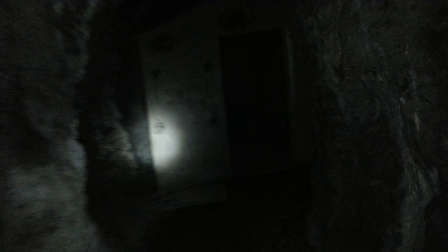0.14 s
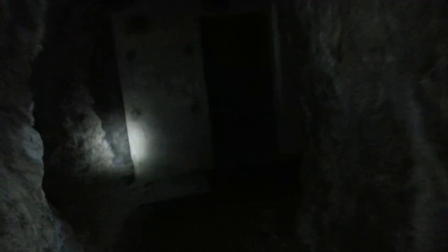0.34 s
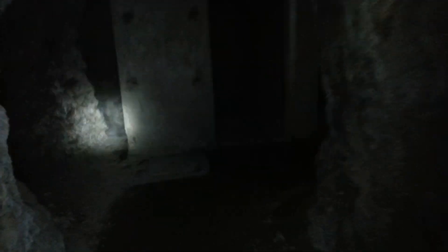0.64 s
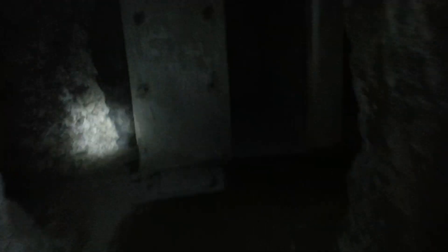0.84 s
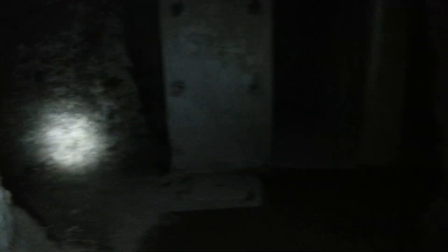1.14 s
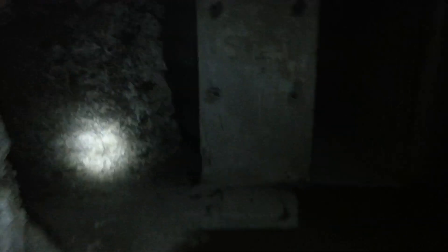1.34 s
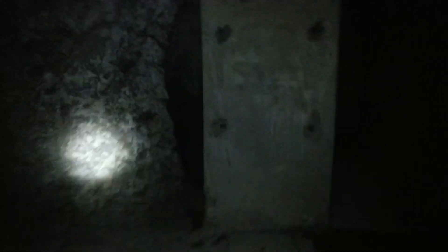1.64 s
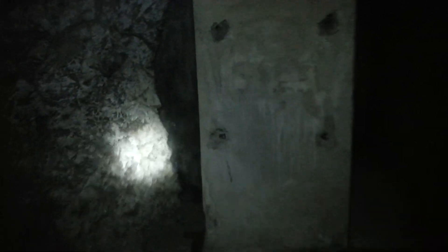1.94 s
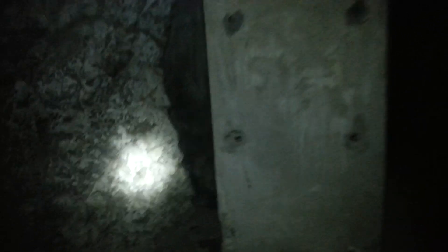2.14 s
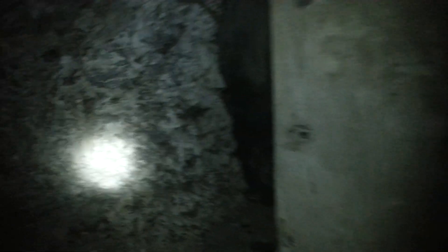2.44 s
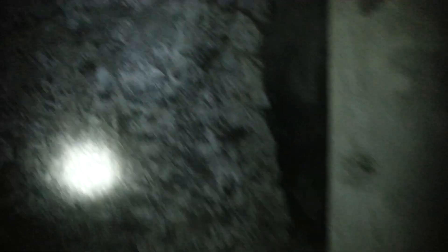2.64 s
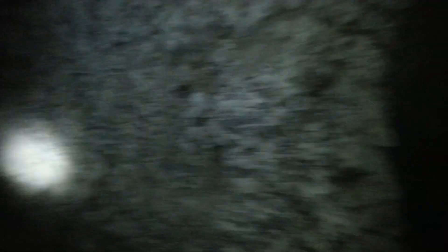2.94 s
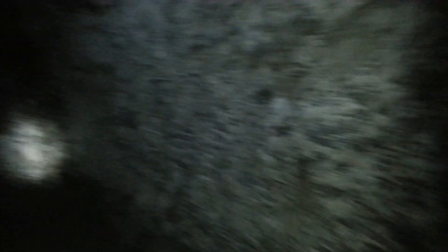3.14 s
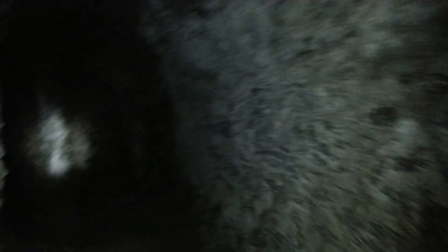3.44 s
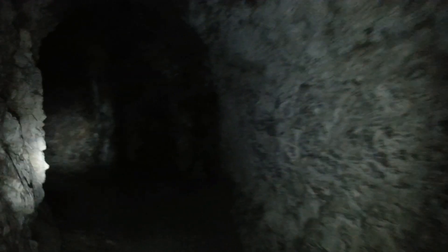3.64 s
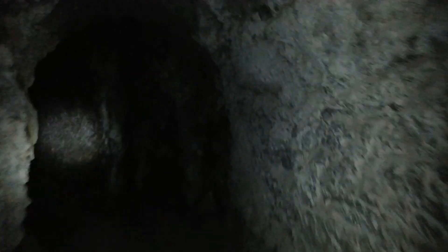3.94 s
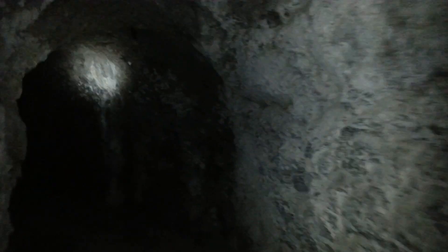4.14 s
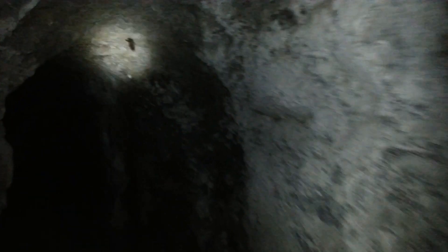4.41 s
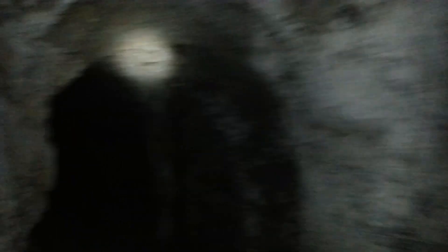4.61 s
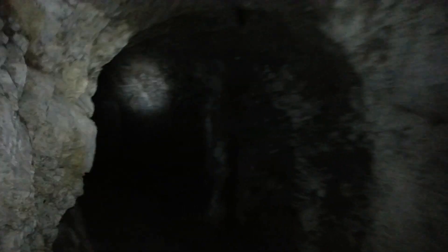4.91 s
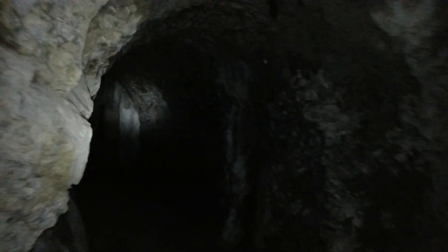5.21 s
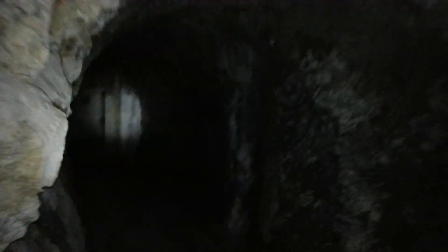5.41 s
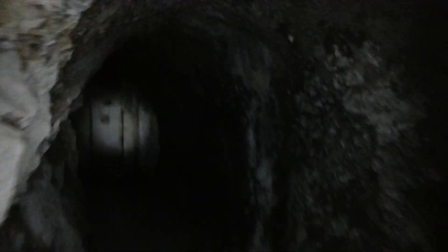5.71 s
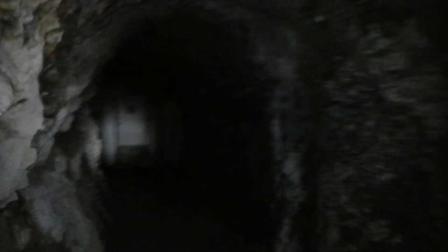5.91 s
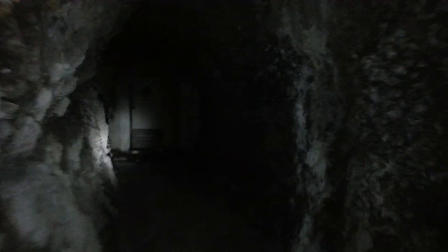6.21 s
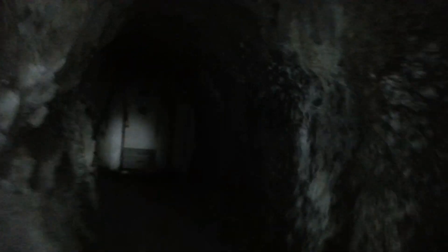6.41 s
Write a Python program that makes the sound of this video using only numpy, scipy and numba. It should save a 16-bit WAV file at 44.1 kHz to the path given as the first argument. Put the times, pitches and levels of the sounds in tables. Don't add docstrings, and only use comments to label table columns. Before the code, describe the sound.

Close stereo sound of boots on a gritty rock floor in a narrow stone tunnel, over faint air and amplifier hiss. From 0 to 0.6 s there is light grinding, small ticks and a very faint, high metal zip tinkle near 0.4-0.6 s. At 0.87 s a firm step lands with a thud and bright gritty crunch. The heaviest step follows at 1.37-1.45 s with hard stone knocks, then grinding and a loud sharp snap at 1.68 s. Another crunch with ticks comes around 2.07-2.2 s. Softer, drier steps and scuffs follow near 2.8 and 3.35 s. A fuller step at 3.84-4.02 s knocks stones, with another knock at 4.43 s. Quiet shuffling leads to lighter steps at 5.2 and 5.8 s, and a crisp stony crunch at 6.46 s. Near walls answer instantly, hollow and ringing, with about half a second of echo.

```python
import sys
import numpy as np
from scipy import signal
from scipy.fft import rfft, irfft, next_fast_len
from scipy.io import wavfile
from numba import njit

SR = 44100
rng = np.random.default_rng(int(sys.argv[2]) if len(sys.argv) > 2 else 0)


def wav_out(sig):
    wavfile.write(sys.argv[1], SR, np.round(np.clip(np.atleast_2d(sig).T, -1, 1) * 32767).astype(np.int16))


def ratio(d):
    e = np.asarray(d, float) / 20
    return 10 ** e


N = 289556
M = next_fast_len(N)
HZ = np.fft.rfftfreq(M, 1 / SR)

# frequency in Hz, density in dB per Hz.
HUSH = [(18, -54), (30, -34), (59, -6.5), (332, 0.5), (1020, -3), (1720, -6), (2240, -9.5), (3150, -7.5),
        (12600, -19.5), (14300, -15.5), (15500, -67)]
HUSH_DB = -48.5
# time in seconds, level in dB.
TAB = [(0.33, -88), (0.378, -52), (0.47, -46), (0.51, -76), (0.606, -50), (0.62, -70)]

# frequency in Hz, T60 in seconds.
TUNNEL_T60 = [(150, 1), (500, 0.53), (1500, 0.58), (4000, 0.52), (10000, 0.62)]
# frequency in Hz, level in dB.
SCATTER = [(150, -2.5), (400, -1), (800, 0.45), (3000, -0.06)]
# frequency in Hz, correlation from 0 to 1.
LIKENESS = [(100, 0.4), (250, .8), (500, 0.65), (1000, 0.03), (4000, 0.01), (12000, 0)]
# entered at in seconds, cross-wave T60 at 220 Hz in seconds.
STRETCHES = [(0, .6), (.845, .6), (1.36, .9), (1.95, .5), (2.6, .5), (3.2, .5), (3.79, .6), (4.28, .6),
             (4.94, .5), (5.195, .7), (5.74, .5), (6.37, .5)]
# frequency in Hz, level in dB.
CROSS_WAVES = [
    [(340, -9), (470, -9), (620, -7), (790, -3)],
    [(190, -11), (275, -10), (330, -9), (415, -9), (445, -8), (590, -10), (712, -10)],
    [(221, -5), (250, -5), (370, -10), (440, -8), (655, -9), (765, -10)],
    [(255, -9), (365, -10), (475, -7), (765, -7)],
    [(370, -8), (470, -8), (562, -10)],
    [(325, -8), (370, -9), (480, -10), (590, -8)],
    [(140, -12), (247, -7), (347, -9), (470, -7), (560, -13), (602, -8)],
    [(245, -8), (360, -9), (460, -10), (600, -10)],
    [(260, -9), (360, -9), (590, -8)],
    [(156, -12), (247, -7), (265, -8), (368, -9), (570, -10)],
    [(260, -10), (325, -9), (430, -9), (550, -9)],
    [(270, -10), (425, -8), (473, -6), (537, -8), (760, -9)],
]
# frequency in Hz, level in dB.
LENGTHWISE_WAVES = [(168, -14), (232, -11), (256, -10)]
ECHO_DB, CROSS_DB = -3.5, -6
NEAR_T60_S, NEAR_DB = 0.062, 10.5
TILT_DB = -2.5
SHORTER = .6

# frequency in Hz, left minus right in dB.
LEAN = [(60, -5), (110, 4.5), (200, 0), (380, 3.5), (700, -1.5), (1290, 5), (2380, 3.5), (4400, 3),
        (8120, -0.5), (15000, 4.5)]
# frequency in Hz, lead of the left in radians.
PORT_LEAD = [(200, 0.1), (600, 0.32), (1500, 0.79), (2700, .6), (5000, 1.6), (12000, 1.6)]
DIRECT_DB = -6.2

# time in seconds, resonance in Hz.
HOLLOW = [(0.0, 734), (.67, 470), (1.35, 493), (2.05, 580), (4.24, 600), (4.41, 1000), (4.52, 900),
          (5.17, 510), (6.57, 590)]
# time in seconds, resonance in Hz.
SLAB = [(0, 2600), (.5, 2800), (.9, 3600), (1.4, 3300), (2.07, 3000), (2.65, 3700), (3.4, 3000),
        (3.86, 4400), (4.0, 2800), (4.7, 3300), (5.26, 3800), (5.8, 4100), (6.57, 3000)]
HOUSING_HZ, HOUSING_DAMP, HOUSING_DB = 1680, .1, -7.5

# time in seconds, peak in dB, pitch in Hz.
TICKS = [(.14, -28, 2710), (.1895, -18, 3400), (.3346, -20, 3000), (.4115, -24, 2300), (.4674, -26, 3000),
         (.5531, -28, 3400), (.9144, -13, 3310), (.9304, -13, 2650), (1.3673, -21, 3470),
         (1.4132, -15, 3000), (1.4374, -17, 3800), (1.4905, -18, 3700), (1.5334, -21, 2400),
         (1.5614, -18, 2600), (1.569, -18, 3300), (2.0234, -23, 2650), (2.0627, -11, 3040),
         (2.0714, -10, 2820), (2.1244, -17, 2030), (2.6314, -31, 2300), (2.6744, -28, 3600),
         (2.7521, -25, 2930), (2.8464, -22, 3300), (2.919, -25, 2200), (3.042, -38, 3060),
         (3.1043, -38, 3150), (3.3543, -26, 2900), (3.8417, -21, 3700), (3.8736, -20, 2500),
         (3.8854, -21, 1830), (3.907, -21, 2960), (3.9534, -22, 3000), (3.9998, -15, 2470),
         (4.0314, -18, 2200), (4.0494, -19, 3500), (4.1114, -24, 4300), (4.5481, -32, 2970),
         (4.6902, -27, 3700), (5.009, -26, 2600), (5.2285, -27, 2900), (5.4084, -36, 3010),
         (5.8374, -25, 4300), (6.2163, -36, 2830), (6.4794, -21, 3500)]
TICK_CYCLES, TICK_DB, TICK_ECHO_DB = 4.5, 4.5, -4
# time in seconds, peak in dB, ring in Hz, low knock in dB.
KNOCKS = [(.188, -21.5, 855, -14), (.335, -16.5, 780, -24), (.554, -29, 706, -1), (.977, -9, 1160, -6),
          (1.375, -4, 680, -4), (1.431, 0, 646, -14), (1.532, -15, 754, -8), (2.179, -26, 942, -2),
          (2.753, -17, 660, -14), (3.235, -25.5, 603, -19), (3.323, -23, 700, 2), (3.442, -23, 1320, -1),
          (3.668, -32.5, 883, -1), (3.833, -13, 630, -9), (4.0, -8, 610, -31), (4.429, -14, 1130, -6),
          (4.557, -28, 1080, -8), (4.959, -26, 604, -9), (5.0095, -23, 430, -18), (5.208, -18, 600, 1),
          (5.869, -21, 1330, 0)]
KNOCK_TICK_DB, KNOCK_T60_MS = -27, 5.6
# time in seconds, peak in dB, ring in Hz, bright tick in dB.
SNAPS = [(.449, -20, 1720, -11.5), (.861, -17, 1460, -7), (.867, -13.5, 4250, -12),
         (1.1955, -17, 1740, -13), (1.616, -14, 3000, -14), (1.68, 1.2, 1777, -25.5),
         (1.81, -18, 3020, -10), (2.001, -14.5, 1730, -31), (2.044, -24, 3030, -9),
         (2.214, -13.5, 1370, -22), (2.639, -33, 1700, -11), (2.789, -23, 1800, -15),
         (2.8355, -17, 3100, -8.5), (2.9265, -16, 1740, -29), (3.773, -39, 1550, -13),
         (3.814, -18.5, 1200, -19.5), (4.297, -21, 1690, -16.5), (4.634, -27, 2640, -4.5),
         (5.114, -32, 1850, -6), (5.782, -21, 1740, -6), (6.053, -21, 1680, -14), (6.385, -33, 3400, -9),
         (6.422, -21, 1340, -18), (6.458, -7.5, 1700, -22)]
SNAP_KNOCK_DB, SNAP_T60_MS = -20, 4.9

# time in seconds, level in dB, swell and fade in seconds per 20 dB.
THUDS = [(0.0, -31, .01, .25), (.19, -26, .07, .055), (.338, -27, .04, .2), (.526, -33.5, .2, .09),
         (.866, -12, .012, .13), (.93, -16, .055, .05), (1.185, -35, .2, .2), (1.374, -9, .005, .08),
         (1.434, -10, .006, .05), (1.63, -31, .03, .12), (1.8, -33, .35, .11), (2.066, -29, .1, .25),
         (2.18, -28, .045, .055), (2.754, -36, .022, .04), (2.848, -32, .075, .085), (3.33, -37, .12, .12),
         (3.446, -33, .03, .06), (3.84, -23, .008, .25), (4.022, -16.5, .05, .045), (4.363, -35, .3, .06),
         (4.63, -32, .1, .2), (4.75, -37, .2, .14), (4.965, -36.5, .018, .08), (5.14, -40, .07, .1),
         (5.21, -26, .008, .1), (5.787, -28, .011, .05), (5.89, -30.5, .12, .09), (6.32, -38, .05, .06),
         (6.42, -24, .012, .025), (6.46, -26, .02, .15)]
# time in seconds, level in dB,
# fade in seconds per 20 dB, fineness from 0 (stones) to 1 (grit).
LANDINGS = [(0.0, -30, .3, .55), (.187, -25, .03, .8), (.398, -30, .1, .2), (.338, -25.5, .047, .85),
            (.854, -24, .05, .7), (.862, -18, .1, .9), (.871, -14, .16, .6), (1.193, -30, .08, .55),
            (1.367, -23, .1, .8), (1.535, -25, .05, .7), (1.682, -24, .03, .6), (1.96, -33, .05, .55),
            (2.002, -27, .15, .52), (2.633, -38, .2, .7), (2.75, -26.5, .06, .8), (2.787, -30, .05, .2),
            (2.928, -29, .015, .3), (3.22, -40, .2, .2), (3.32, -31, .1, .45), (4.293, -46, .1, .6),
            (4.436, -23, .025, .25), (4.55, -39, .15, .4), (3.836, -27, .06, .2), (4.96, -48, .06, -.2),
            (5.205, -27, .03, -.2), (5.23, -34, .1, .6), (5.467, -47, .17, .15), (5.785, -28, .12, .5),
            (6.422, -22.5, .02, .9), (6.46, -10, .02, -.4), (6.472, -22, .12, .48)]
# time of the height in seconds, level in dB,
# swell and fade in seconds per 20 dB, fineness from 0 (stones) to 1 (grit).
ROLLS = [(.19, -29, .05, .04, .55), (.456, -31, .17, .17, .75), (.526, -35, .1, .12, .2),
         (.93, -19, .065, .08, .45), (1.432, -13, .005, .04, -.4), (1.455, -27, .03, .08, .6),
         (1.568, -20, .05, .05, .85), (1.62, -18, .03, .03, .72), (2.066, -18, .075, .13, .8),
         (2.18, -19, .035, .14, .02), (2.27, -32, .3, .13, .85), (2.655, -36, .08, .1, .45),
         (2.848, -29, .2, .12, .35), (3.365, -24.5, .045, .065, .6), (3.446, -31, .06, .11, .25),
         (3.85, -21, .02, .17, .3), (3.96, -28, .25, .1, .4), (4.02, -17, .055, .085, .3),
         (4.355, -40, .1, .04, .8), (4.63, -34, .1, .1, .35), (4.735, -30, .2, .04, .4),
         (5.26, -29.5, .08, .095, .58), (5.301, -31, .1, .05, .3), (5.885, -26, .13, .09, .4)]
# time in seconds, level in dB,
# swell (and equal fade) in seconds per 20 dB, fineness from 0 (stones) to 1 (grit).
SCUFFS = [(.27, -33, .12, .52), (.68, -42, .2, .55), (1.14, -33, .1, .52), (1.778, -31, .05, -.4),
          (4.14, -35, .09, .6), (1.9, -42, .25, .48), (2.532, -42, .035, .65), (3.69, -44, .03, .3),
          (5.133, -41, .12, .65), (2.61, -43, .04, .9), (5.74, -42, .1, .4), (5.96, -36, .04, .8),
          (6.24, -44, .1, .8), (6.4, -37, .015, .6), (6.321, -42, .11, .3)]
# time in seconds, level in dB, swell and fade in seconds per 20 dB.
PUFFS = [(.19, -36, .045, .05), (.46, -43, .1, .1), (.856, -26, .006, .05), (.872, -14.5, .006, .075),
         (1.1, -44, .03, .05), (2.7, -45, .08, .08), (1.376, -31, .006, .1), (1.455, -28, .025, .065),
         (1.62, -30, .03, .03), (1.818, -38, .08, .08), (2.055, -28, .07, .09), (3.35, -44, .04, .05),
         (2.94, -45, .04, .05), (4.35, -42, .06, .09), (3.45, -44, .04, .1), (3.845, -28, .03, .08),
         (4.04, -35, .06, .05), (4.115, -40, .03, .07), (4.73, -42, .15, .05), (4.98, -45, .04, .08),
         (5.3, -43, .1, .08), (5.613, -45, .065, .065), (5.785, -35, .01, .03), (5.86, -40, .08, .06),
         (6.17, -42, .035, .08), (6.47, -36, .03, .08)]
# low and high edge in Hz, cracks per second, size scatter in dB.
GRAINS = [
    (152, 850, 500, 2),
    (734, 1870, 900, 1.8),
    (2250, 5400, 1400, 3.2),
    (5720, 13000, 2500, 2.6),
]
GRAIN_DB = [
    .3,
    -.6,
    -.9,
    -1.6,
]
CREEP_DB = [
    -57,
    -58,
    -60,
    -70,
]
# frequency in Hz, density in dB per Hz.
FLOOR_COLOUR = [(24, -81), (40, -58), (98, -5.5), (183, -3), (218, -2), (294, 4), (438, 3.5), (522, -2.5),
                (1190, -3), (1740, -2.5), (2220, -16.5), (4130, -22), (6010, -22.5), (14000, -33),
                (15500, -65)]
BIGGEST = 3.66
CLUMP_DB, CLUMP_S = 3.2, .012
LANDING_S, GRADE_DB = .006, 10.5
DUST_DB = -17.5


def level(x, db):
    return x * ratio(db) / np.sqrt(np.mean(x ** 2))


def along(table, hz):
    rows = np.array(table)
    return np.interp(np.log(np.maximum(hz, 1)), np.log(rows[:, 0]), rows[:, 1])


def band(x, lo_hz, hi_hz):
    return signal.sosfilt(signal.butter(3, [lo_hz, hi_hz], "bandpass", fs=SR, output="sos"), x)


def causal(table):
    cep = irfft(np.log(ratio(along(table, np.fft.rfftfreq(2048, 1 / SR)))))
    cep[1:1024] *= 2
    cep[1025:] = 0
    return irfft(np.exp(rfft(cep)))[:1024]


def decay(t, t60):
    return np.exp(-np.log(1000) * t / t60)


def ring(hz, t60, t):
    return np.sin(2 * np.pi * hz * t) * decay(t, t60)


def pair(count):
    mid, side = rfft(rng.standard_normal((2, count)))
    alike = np.clip(along(LIKENESS, np.fft.rfftfreq(count, 1 / SR)), -1, 1)
    opposite = np.array([[1], [-1]])
    return irfft(np.sqrt(1 + alike) * mid + np.sqrt(1 - alike) * side * opposite, count)


def hush():
    return level(irfft(rfft(pair(M)) * ratio(along(HUSH, HZ)), M)[:, :N], HUSH_DB)


def zip_tab():
    s, db = np.transpose(TAB)
    taps = (rng.random((2, N)) < 400 / SR) * rng.standard_normal((2, N))
    t = np.arange(2048) / SR
    modes = ring(12200, .012, t) + ring(12900, .012, t)
    modes += .6 * ring(9600, .015, t) + .4 * ring(8700, .015, t)
    tinkle = level(signal.oaconvolve(taps, modes[None], axes=1)[:, :N], 0)
    return tinkle * ratio(np.interp(np.arange(N) / SR, s, db - 2, -120, -120))


def tunnel(waves, t60):
    t = np.arange(SR) / SR
    wash, tail = pair(SR), 0
    near = ratio(NEAR_DB) * decay(t, NEAR_T60_S)
    edges = 60 * 2. ** np.arange(9)
    for lo, hi in zip(edges[:-1], edges[1:]):
        centre = np.sqrt(lo * hi)
        fade = near + decay(t, along(TUNNEL_T60, centre))
        tail = tail + ratio(along(SCATTER, centre)) * band(wash, lo, hi) * fade
    tail = tail * np.clip((t - .002) / 0.001, 0, 1)
    cross = 0
    for hz, db in waves + LENGTHWISE_WAVES:
        tilt_db = TILT_DB * np.log2(max(hz / 220, 1))
        cross = cross + ratio(db + tilt_db) * ring(hz, t60 * (220 / hz) ** SHORTER, t)
    return ratio(ECHO_DB) * tail / np.sqrt(np.sum(tail ** 2) / 2) + ratio(CROSS_DB - 43) * cross


def echo_of(x):
    out = np.zeros((2, N + SR))
    cuts = [int(s * SR) for s, _ in STRETCHES] + [N]
    for a, b, (_, t60), waves in zip(cuts, cuts[1:], STRETCHES, CROSS_WAVES):
        for patch in x:
            out[:, a:b + SR - 1] += signal.oaconvolve(patch[None, a:b], tunnel(waves, t60), axes=1)
    return out[:, :N]


@njit
def resonate(x, hz, damping):
    y, b, l = np.empty(len(x)), 0., 0.
    for i in range(len(x)):
        g = np.tan(np.pi * hz[i] / SR)
        v = (b + g * (x[i] - l)) / (1 + g * (g + damping))
        b, l, y[i] = 2 * v - b, l + 2 * g * v, damping * v
    return y


def ground(x):
    t = np.arange(N) / SR
    hollow = np.interp(t, *np.transpose(HOLLOW))
    slab = np.interp(t, *np.transpose(SLAB))
    housing = np.full(N, 1. * HOUSING_HZ)
    patches = []
    for v in x:
        floor = v + 0.96 * resonate(v, hollow, 0.41) + 0.85 * resonate(v, slab, 0.42)
        patches.append(floor + ratio(HOUSING_DB) * resonate(v, housing, HOUSING_DAMP))
    return ratio(-1.5) * np.array(patches)


def ticks():
    out, t = np.zeros(N + 512), np.arange(512) / SR
    for s, db, hz in TICKS:
        i = int((s + .0008) * SR)
        t60 = TICK_CYCLES / hz
        out[i:i + len(t)] += ratio(db + TICK_DB) * (ring(hz, t60, t) + .3 * ring(1.6 * hz, t60, t))
    return out[:N]


def stones():
    out, t = np.zeros(N + 2048), np.arange(2048) / SR
    every = [(s, db, hz, knock_db, KNOCK_TICK_DB, KNOCK_T60_MS) for s, db, hz, knock_db in KNOCKS]
    every += [(s, db, hz, SNAP_KNOCK_DB, tick_db, SNAP_T60_MS) for s, db, hz, tick_db in SNAPS]
    for s, db, hz, knock_db, tick_db, t60_ms in every:
        tick = band(rng.standard_normal(len(t)) * np.exp(-t / 0.0014), 2470, 5200)
        tick /= np.abs(tick).max()
        snap = ring(hz, t60_ms / 1000, t)
        snap += 0.6 * ring(1.29 * hz, t60_ms / 1100, t) + 0.23 * ring(1.855 * hz, t60_ms / 1400, t)
        snap *= 1 - np.exp(-t * hz / 0.63)
        knock = (ring(265, 0.012, t) + ring(577, 0.021, t)) * (1 - np.exp(-t / 0.0016))
        stone = snap + ratio(knock_db - 10) * knock + ratio(tick_db + 3) * tick
        i = int((s + .0004) * SR)
        out[i:i + len(t)] += ratio(db + 5.5) * stone
    return out[:N]


def pressure(rows, creep_db, offset_db=0):
    t = np.arange(0, N / SR + .01, .001)
    s, db, swell, fade = rows[:, :4, None].transpose(1, 0, 2)
    db = db + np.reshape(offset_db, (-1, 1)) - 20 * np.maximum((s - t) / swell, (t - s) / fade)
    force = np.sqrt(np.sum(ratio(2 * db), axis=0) + ratio(2 * creep_db))
    return np.interp(np.arange(N) / SR, t, force)


def tread():
    landings = [(s, db, LANDING_S, fade, fine) for s, db, fade, fine in LANDINGS]
    scuffs = [(s, db, swell, swell, fine) for s, db, swell, fine in SCUFFS]
    grinds = np.array(ROLLS + landings + scuffs)
    fineness = grinds[:, 4]
    thud = pressure(np.array(THUDS), CREEP_DB[0])
    coarse = pressure(grinds, CREEP_DB[1], -GRADE_DB * fineness ** 2)
    grit = pressure(grinds, CREEP_DB[2], -GRADE_DB * (fineness - 1) ** 2)
    dust = np.hypot(ratio(DUST_DB) * grit, pressure(np.array(PUFFS), CREEP_DB[3]))
    return thud, coarse, grit, dust


def boots():
    t, out = np.arange(N) / SR, 0
    knots = np.arange(0, N / SR + 1, CLUMP_S)
    colour = causal(FLOOR_COLOUR)[None]
    for (lo, hi, rate, scatter_db), force, db in zip(GRAINS, tread(), GRAIN_DB):
        chance, size, sign = rng.random((3, 2, N))
        size = np.minimum(-np.log(1 - size), BIGGEST)
        clump_db = CLUMP_DB * np.interp(t, knots, rng.standard_normal(len(knots)))
        cracks = (chance < rate / SR) * ratio(scatter_db * size + clump_db) * np.sign(sign - .5)
        coloured = signal.oaconvolve(band(cracks, lo, min(hi, .45 * SR)), colour, axes=1)[:, :N]
        out = out + level(coloured, db) * force
    return out


def scene():
    grit, hits, cracks = ground(boots()), stones(), ticks()
    echo = echo_of((grit + ratio(3.0) * hits + ratio(TICK_ECHO_DB) * cracks) / np.sqrt(2))
    apart = np.clip(HZ / 900, 0, 1) * .6
    heel, toe = rfft(grit, M)
    grinding = (heel + apart * toe * np.array([[1], [-1]])) / np.sqrt(1 + apart ** 2)
    direct = ratio(DIRECT_DB) * grinding + rfft(hits + cracks, M)
    half = np.array([[.5], [-.5]])
    lean = ratio(along(LEAN, HZ) * half)
    lead = np.exp(1j * along(PORT_LEAD, HZ) * half)
    return irfft((direct * lead + rfft(echo, M)) * lean, M)[:, :N] + zip_tab()


def band_limit(x):
    return signal.sosfilt(signal.butter(12, 15730, fs=SR, output="sos"), x)


def record(dry):
    x = signal.sosfilt(signal.butter(2, 170, "highpass", fs=SR, output="sos"), dry) + hush()
    rounded = np.tanh(.7 * x) / .7
    mix = signal.sosfilt(signal.ellip(8, .2, 60, 14800, fs=SR, output="sos"), rounded)
    return band_limit(mix)


dry = scene()
out = record(dry)
wav_out(out)
```